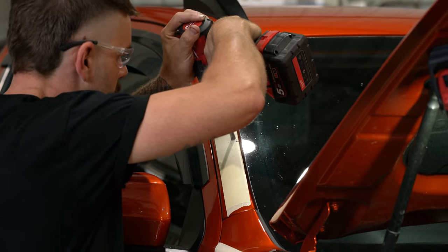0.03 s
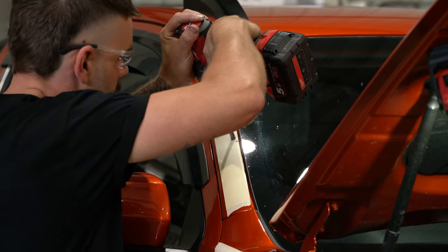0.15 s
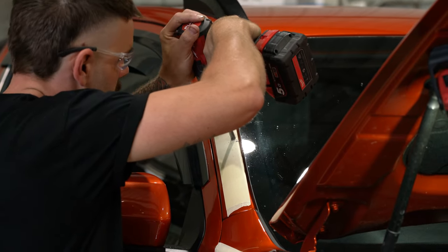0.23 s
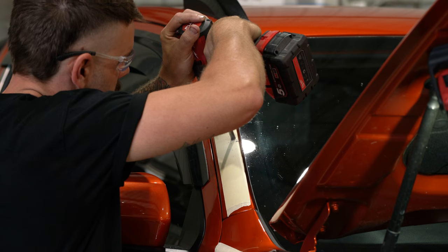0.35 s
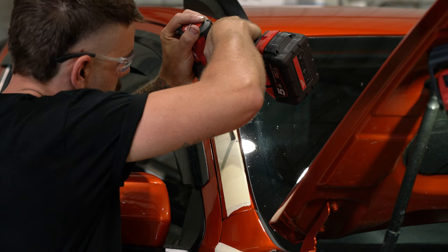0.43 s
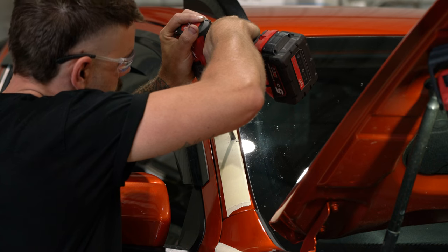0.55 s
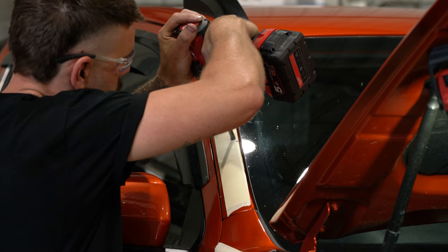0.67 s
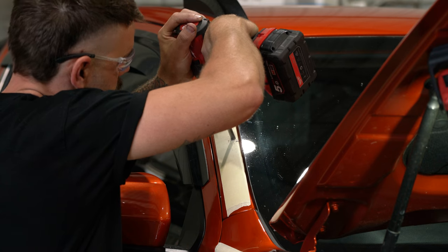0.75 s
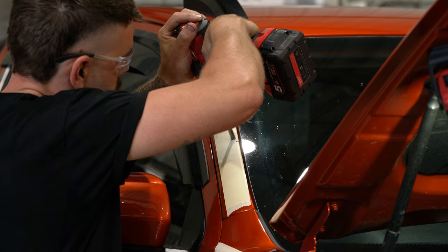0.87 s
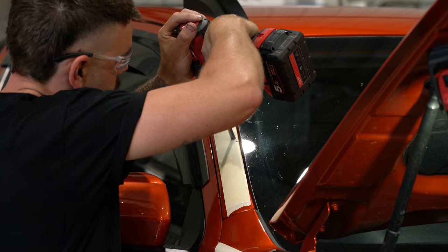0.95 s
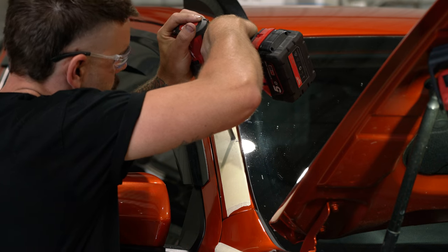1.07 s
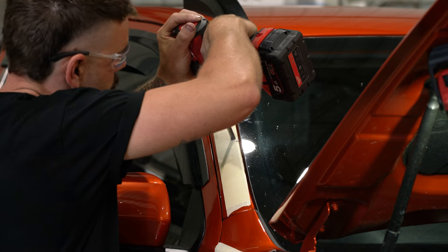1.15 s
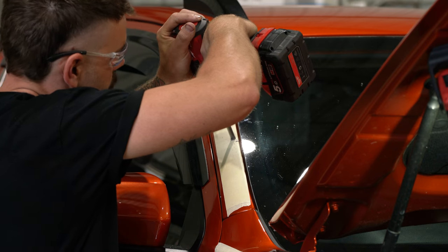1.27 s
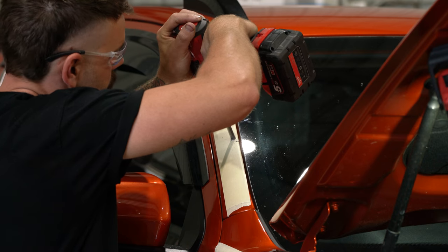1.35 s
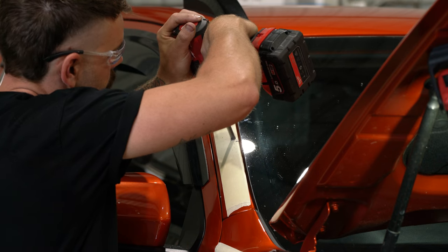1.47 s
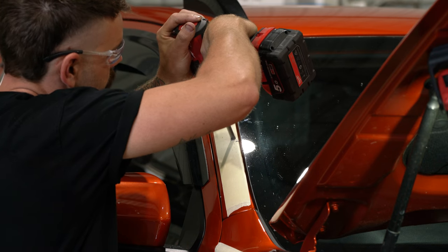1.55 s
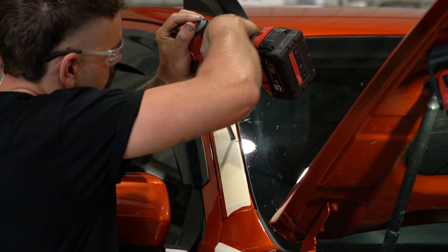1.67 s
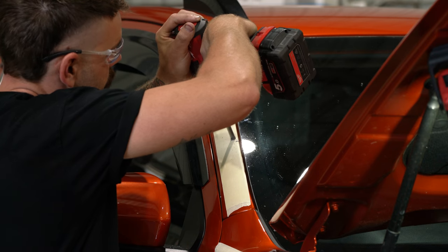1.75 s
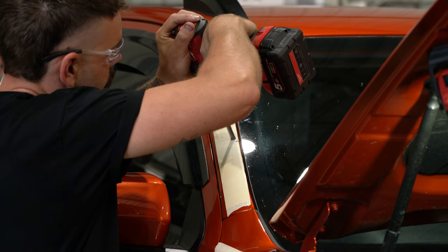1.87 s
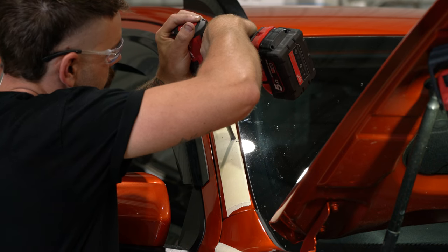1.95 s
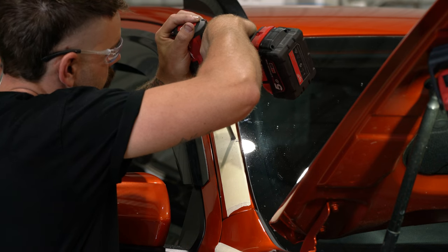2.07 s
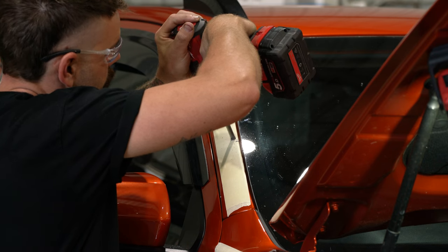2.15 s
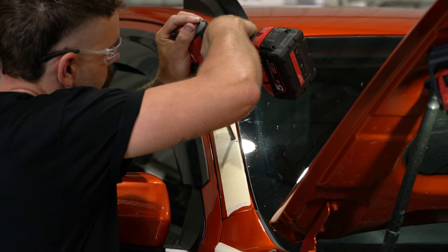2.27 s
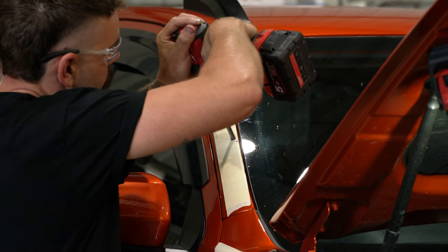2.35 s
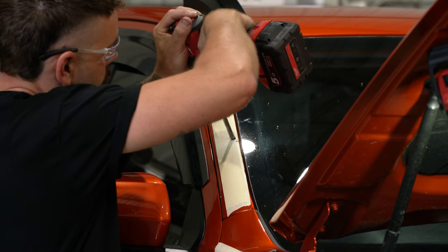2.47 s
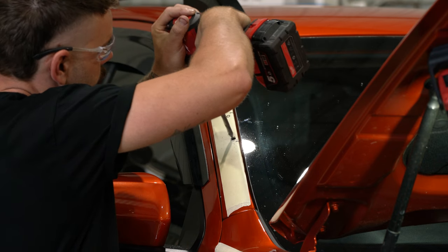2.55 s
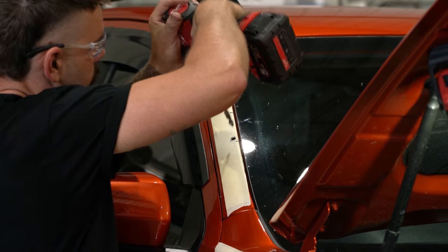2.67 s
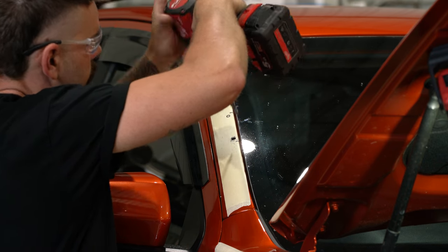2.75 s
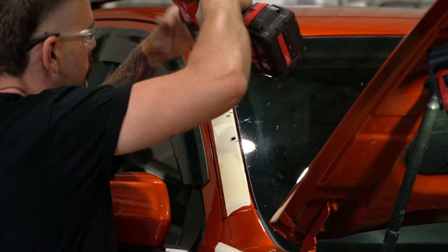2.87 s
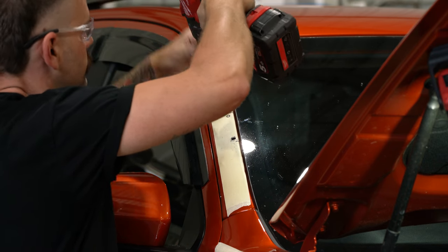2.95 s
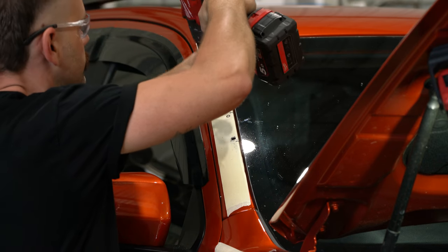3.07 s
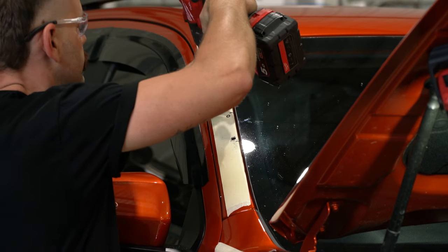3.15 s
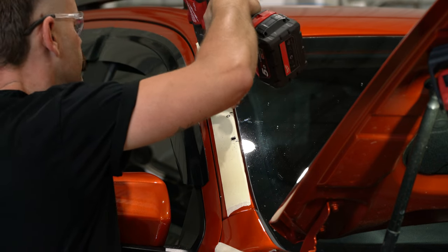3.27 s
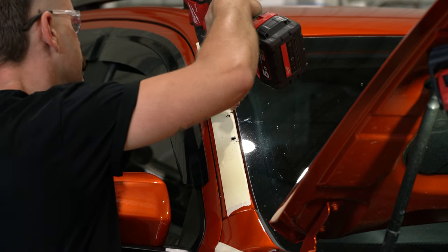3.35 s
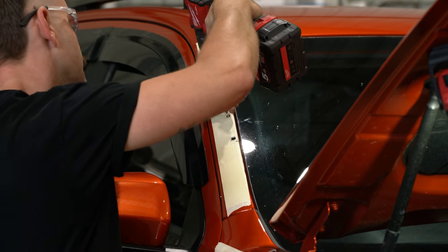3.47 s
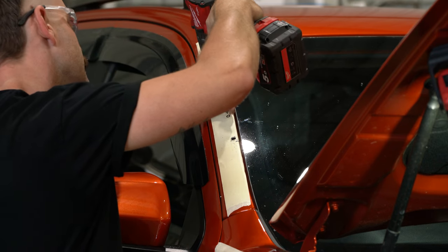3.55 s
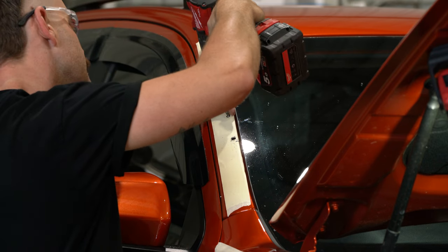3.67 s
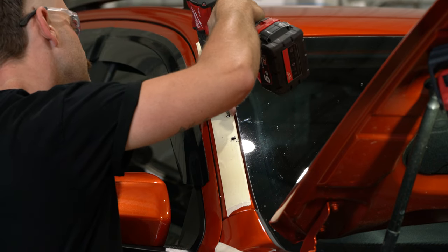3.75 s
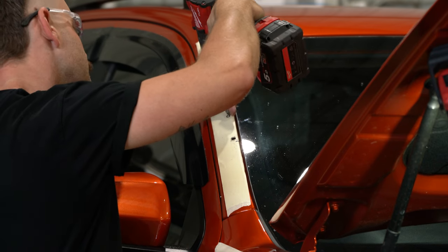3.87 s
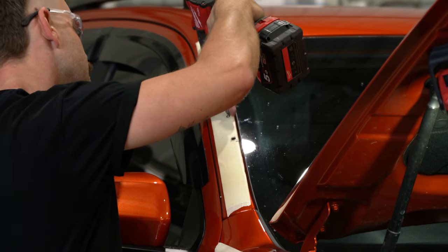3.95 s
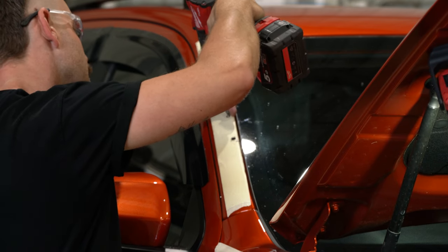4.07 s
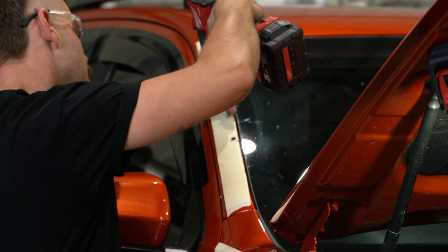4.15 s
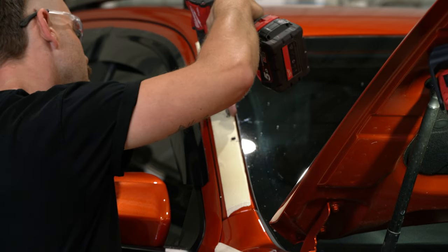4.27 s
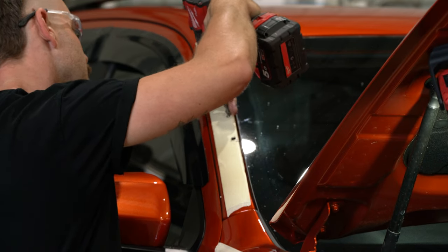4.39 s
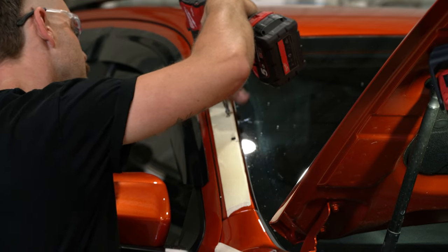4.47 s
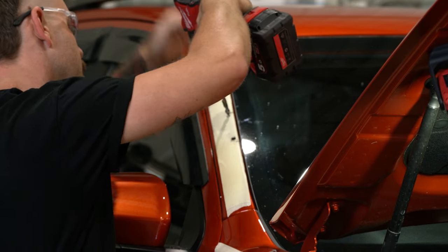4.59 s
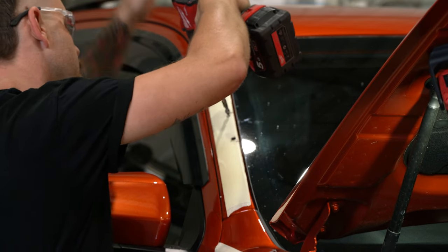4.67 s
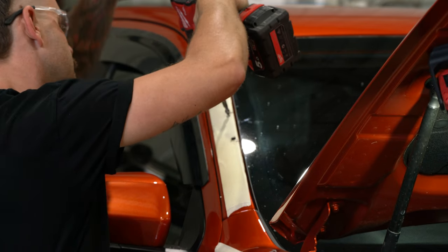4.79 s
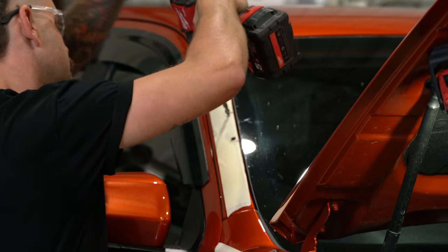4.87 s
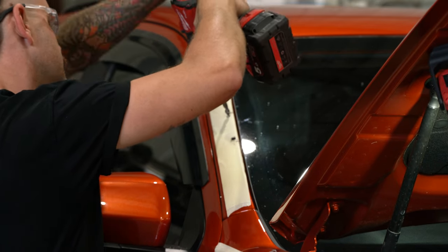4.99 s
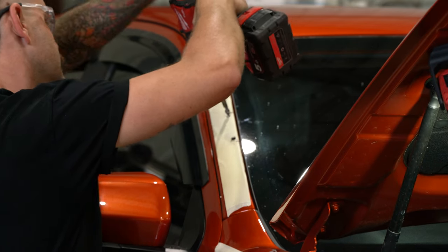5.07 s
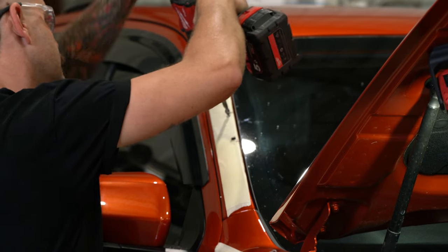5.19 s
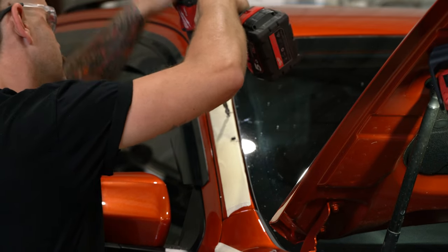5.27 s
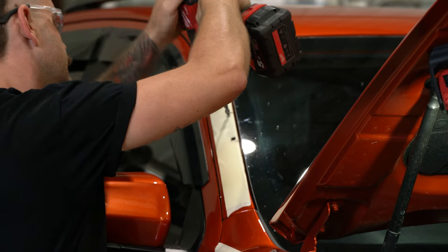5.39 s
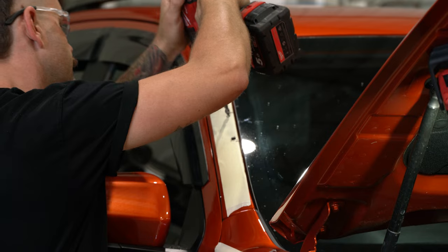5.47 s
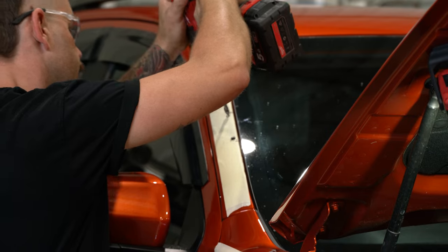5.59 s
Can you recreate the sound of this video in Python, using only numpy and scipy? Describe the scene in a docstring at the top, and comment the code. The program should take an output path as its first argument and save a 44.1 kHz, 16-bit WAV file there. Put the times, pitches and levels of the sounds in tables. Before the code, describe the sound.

In a large reverberant workshop, a nearby microphone catches a drill's piercing electric whine and gear buzz over gritty metal scraping. Early chirps and chip crackles lead to a harsh low judder, then short squeals. The motor drops to a stop in a fraction of a second, with sharp knocks. Afterwards there is mostly steady air noise and faint hum, then quiet handling clicks, cloth rustle and a dull bump.

```python
"""A drill motor whines close by as its bit scrapes through the sheet metal of a car pillar, in a large workshop.
Whine and gear lines are sines on the rotor angle; the whine passes a housing resonance and its pitch sags and recovers.
Two flutes, timed by spindle angle, scrape off chips (filtered grains), judder and squeal (gated sines).
The brake stops it with a falling growl and a clatter; the hall rings out (noise tail) over ventilation and a far hum.
Clicks, thuds and brushing (filtered noise, short sines) follow as the tool is handled."""
import sys
import numpy as np
from scipy import signal
from scipy.fft import rfft, irfft, next_fast_len
from scipy.io import wavfile
from scipy.ndimage import uniform_filter1d

SR = 44100
rng = np.random.default_rng(int(sys.argv[2]) if len(sys.argv) > 2 else 0)


def store_wav(level_fs):
    """Save 16-bit WAV to argv[1]."""
    pcm = np.round(np.clip(np.atleast_2d(level_fs), -1, 1) * 32767)
    wavfile.write(sys.argv[1], SR, pcm.T.astype(np.int16))


N = 248283
T = np.arange(N) / SR


def undb(db):
    """Decibels to gain."""
    return 10 ** (np.asarray(db) / 20)


def unit(x):
    """Scale to rms 1."""
    return x / np.sqrt(np.mean(x ** 2) + 1e-18)


def curves(table):
    """Table columns after the first, interpolated linearly over time."""
    s, *columns = np.transpose(table)
    return [np.interp(T, s, column) for column in columns]


def walk(rate_hz):
    """Smoothed random steps of rms 1, about rate_hz changes a second."""
    step = max(int(SR / rate_hz), 1)
    held = np.repeat(rng.standard_normal(N // step + 1), step)
    return unit(uniform_filter1d(held, step)[:N])


def noise():
    """White Gaussian noise."""
    return rng.standard_normal(N)


def colour(x, spectrum, tilt_db_per_octave=0):
    """Minimum-phase filter with the given spectrum, via the folded cepstrum."""
    size = next_fast_len(N + SR // 4, real=True)
    size += size % 2
    octave = np.log2(np.maximum(np.fft.rfftfreq(size, 1 / SR), 1))
    hz, db = np.transpose(spectrum)
    tilted_db = db + tilt_db_per_octave * np.log2(hz / hz[0])
    gain = undb(np.interp(octave, np.log2(hz), tilted_db))
    cepstrum = irfft(np.log(gain))
    # fold to positive time: makes the filter causal
    cepstrum[1:size // 2] *= 2
    cepstrum[size // 2 + 1:] = 0
    return irfft(rfft(x, size) * np.exp(rfft(cepstrum)))[:N]


def grains(rate_hz, spread_db):
    """Random tiny fractures, a few much larger than the rest."""
    size = undb(spread_db * np.minimum(rng.exponential(size=N), 5))
    return (rng.random(N) < rate_hz / SR) * size * rng.choice([-1, 1], N)


def swell(s, length_s):
    """Bell-shaped envelope centred on s."""
    return np.exp(-np.minimum((2 * (T - s) / length_s) ** 2, 50))


def ramp(start_s, length_s):
    """Linear rise from 0 to 1 over length_s."""
    return np.clip((T - start_s) / max(length_s, 1 / SR), 0, 1)


def decay(s, t60_s):
    """Decay from s, falling 60 dB every t60_s."""
    return np.exp(-np.log(1000) * (T - s) / t60_s)


def catches(cycles, s, width):
    """One bell-shaped touch per cycle, one of them at s; width is a share of the cycle."""
    offset = (cycles - np.interp(s, T, cycles) + .5) % 1 - .5
    return np.exp(-(2 * offset / width) ** 2)


def sine(turns):
    """Sine of rms 1 from phase in turns."""
    return np.sqrt(2) * np.sin(2 * np.pi * turns)


def glide(hz):
    """Phase in turns of a varying frequency."""
    return np.cumsum(hz) / SR


POLES, FULL_SPEED_HZ = 8, 376.7  # magnetic pulls per turn; rotor speed at full trigger
HOUSING_HZ, HOUSING_WIDTH_HZ = 2870, 430
# rotor harmonics and gear meshes: multiple of rotor speed, level at half trigger/dB, level at full trigger/dB
MESH_LINES = [(1, -46.5, -44.5), (4, -35.5, -41.5), (7, -39, -38), (9, -39.5, -42), (10.22, -27, -35.5),
              (10.5, -30.5, -48), (13, -38, -34.5), (13.2, -30.5, -44)]
# gearbox rattle spectrum: f/Hz, level/dB per Hz
GEARBOX_SPECTRUM = [(100, -26), (300, -37.5), (480, -12.5), (780, 0), (1000, 4), (1200, -7.5), (1800, -20),
                    (2050, -0.5), (2600, -13.5), (3400, 1), (3950, -2), (4500, -9), (6500, -22),
                    (10500, -27), (15500, -42.5)]
# tool casing spectrum, also rung by chips, blows and clatter: f/Hz, level/dB per Hz
CASING_SPECTRUM = [(30, -62), (150, -26), (450, -13), (850, 3), (1600, -2), (3000, 4.5), (4200, -5),
                   (5200, -5.5), (7000, -10), (8500, -21), (12000, -22.5), (15500, -41)]


def motor(rotor, hz, whine_db, running, loose, mesh_flutter_db=0.7, mesh_db_per_hz=0.1,
          slack_turns=0.03, loose_slack_turns=.05, rattle_db=-26.5, rumble_db=-31.0,
          rumble_tilt_db=-6, flutter_db=0.27):
    """Magnetic pulls whine through the housing mode; slack gears add lines, louder with speed, and a rattle."""
    housing = 1 / np.hypot(1, 2 * (POLES * hz - HOUSING_HZ) / HOUSING_WIDTH_HZ)
    flutter = flutter_db * (1 + 2 * loose) * walk(60)
    whine = housing * undb(whine_db + flutter) * sine(POLES * rotor)
    play = slack_turns + loose_slack_turns * loose
    speed_db = mesh_db_per_hz * (hz - FULL_SPEED_HZ)
    mesh = np.zeros(N)
    for multiple, half_db, full_db in MESH_LINES:
        line_db = loose * half_db + (1 - loose) * (full_db + speed_db)
        line_gain = undb(line_db + mesh_flutter_db * walk(60))
        mesh += line_gain * sine(multiple * rotor + play * walk(130))
    once_per_turn = 1 + 0.22 * np.cos(2 * np.pi * rotor)
    rattle = unit(colour(noise() * once_per_turn, GEARBOX_SPECTRUM))
    rumble = unit(colour(noise(), CASING_SPECTRUM, rumble_tilt_db))
    gears = mesh + undb(rattle_db) * rattle + undb(rumble_db) * loose * rumble
    return whine + running * gears


def whistle(low_hz=9465, low_db=-56, high_hz=14400, high_db=-65):
    """Two faint tones flicker high above the whine, at nearly constant pitch."""
    low = undb(low_db + 2 * walk(20)) * sine(glide(low_hz + 22 * walk(60)))
    high = undb(high_db + 2 * walk(20)) * sine(glide(high_hz + 18 * walk(60)))
    return low + high


BRAKE_S, STOP_S = 2.627, 2.686


def brake(rotor, hz, growl_db=-16, ring_hz=930, width_hz=560, fade_hz=760, rough_db=3,
          slack_turns=.09, clatter_db=-24):
    """Braked gears growl four times a turn, sweeping down through a gearbox resonance; teeth clatter."""
    growl_hz = 4 * hz
    resonance = 1 / (1 + (2 * (growl_hz - ring_hz) / width_hz) ** 2)
    force = np.clip(growl_hz / fade_hz, 0, 1) ** 4
    rough = undb(rough_db * walk(300))
    growl = force * resonance * rough * sine(4 * rotor + slack_turns * walk(300))
    clatter = unit(colour(grains(rate_hz=3000, spread_db=4), CASING_SPECTRUM))
    return undb(growl_db) * growl + undb(clatter_db) * ramp(BRAKE_S, 0.027) * clatter


# scraped sheet spectrum: f/Hz, level/dB per Hz
SCRAPE_SPECTRUM = [(200, -37.5), (550, -24), (800, -11), (1130, -1), (1450, 2.5), (1800, -1), (3300, -0.5),
                   (4600, -9), (6000, -10), (7800, -19), (11000, -30), (15500, -37)]


def cutting(spindle, feed_db, locked, scrape_db=1.3, uneven_db=1.4, chip_db=-16, bite_db=1.33,
            judder_bite_db=.5):
    """Each of two flutes tears at the sheet once a turn; chips snap off brightly."""
    bite = np.cos(4 * np.pi * spindle) + 0.5 * np.cos(2 * np.pi * spindle)
    force = undb((bite_db + judder_bite_db * locked) * bite + uneven_db * walk(120))
    scrape = unit(colour(grains(rate_hz=7000, spread_db=2.5) * force, SCRAPE_SPECTRUM))
    flakes = grains(rate_hz=400, spread_db=3.3) * force ** 2.5
    chips = unit(colour(flakes, CASING_SPECTRUM, tilt_db_per_octave=7))
    return undb(feed_db) * (undb(scrape_db) * scrape + undb(chip_db) * chips)


def skating(level_db=-41):
    """A bright hiss of grains as the bit skates."""
    return undb(level_db) * unit(colour(grains(rate_hz=7000, spread_db=2.5), CASING_SPECTRUM, 5))


JUDDER_S, JUDDER_ATTACK_S, JUDDER_HOLD_S, JUDDER_RELEASE_S = 1.011, .05, .56, .2
JUDDER_LIGHT_HZ, JUDDER_LOCKED_HZ = 1850, 1381


def chatter(spindle, feed_db, locked, light_db=-2.5, locked_db=-4.3, second_db=0, third_db=-10,
            uneven_db=2.0, stray_share=.045):
    """Each flute judders in a short rasp, low and rich once locked in, rising as the edge breaks free."""
    hz = JUDDER_LIGHT_HZ + locked * (JUDDER_LOCKED_HZ - JUDDER_LIGHT_HZ)
    flute = (2 * spindle + .5) % 1
    grip = unit(np.sin(np.pi * flute) ** 4 * undb(uneven_db * walk(49.92)))
    # pitch strays more when lightly pressed
    stray = stray_share * (2 - locked) * walk(60) + .03 * walk(250)
    release = np.clip(4.5 * (flute - .48), 0, 2) ** 1.5 * np.abs(walk(50))
    turns = glide(hz * (1 + .4 * release + stray))
    overtones = undb(second_db) * sine(2 * turns) + undb(third_db) * sine(3 * turns)
    rasp = sine(turns) + locked * overtones
    level_db = feed_db + light_db + locked * (locked_db - light_db)
    return undb(level_db) * grip * rasp


# spells of stick-slip: centre t/s, length/s, level/dB, squeals per turn
SQUEAL_SPELLS = [(.068, .16, -32.5, 1), (.621, 0.048, -25.5, 2), (.681, .07, -26, 2), (1.686, .08, -26, 1),
                 (1.805, 0.074, -20, 1), (1.885, .03, -21.5, 1), (1.926, 0.063, -20, 1),
                 (2.125, 0.24, -31, 1)]


def squeals(spindle, feed_db, bit_hz=6450, octave_db=-25, patchy_db=2, stick_turns=0.29,
            sing_db=-17, fed_db=-23, waver_hz=45):
    """The bit sings faintly at its own mode and squeals where it sticks, at the same angle of each turn."""
    stick = np.zeros(N)
    for s, length_s, db, count in SQUEAL_SPELLS:
        per_turn = round(count)
        touch = catches(per_turn * spindle, s, per_turn * stick_turns)
        stick += undb(db) * swell(s, length_s) * (touch + undb(sing_db))
    turns = glide(bit_hz + waver_hz * walk(400))
    tone = sine(turns) + undb(octave_db) * sine(2 * turns)
    return (stick + undb(feed_db + fed_db)) * undb(patchy_db * walk(120)) * tone


# spells of thin chirps: centre t/s, length/s, level/dB
CHIRP_SPELLS = [(.044, 0.062, -30.5), (.139, 0.12, -32.5), (.457, .025, -36), (.602, .012, -39)]


def chirps(spindle, feed_db, edge_hz=11540, width=0.28, fed_db=-27, patchy_db=4):
    """The edge chirps thinly as each flute passes: faintly with the feed, clearly in a few spells."""
    spells = np.zeros(N)
    for s, length_s, db in CHIRP_SPELLS:
        spells += undb(db) * swell(s, length_s) * catches(2 * spindle, s, width)
    faint_gain = undb(feed_db + fed_db + patchy_db * walk(50))
    faint = faint_gain * catches(2 * spindle, JUDDER_S, width)
    return (spells + faint) * sine(glide(edge_hz + 70 * walk(500)))


# large chips snapping off: t/s, level/dB
CHIP_SNAPS = [(.28, -34), (.29, -29), (.314, -25.5), (.437, -23.5), (0.456, -23), (.48, -22.5),
              (1.028, -24), (1.048, -28)]


def snaps(length_s=0.0047, tilt_db=7):
    """The largest chips break with a brief, bright crackle."""
    burst = sum(undb(db) * swell(s, length_s) for s, db in CHIP_SNAPS)
    return burst * unit(colour(noise(), CASING_SPECTRUM, tilt_db))


# blows of brake, spindle lock and hand on the tool: t/s, level/dB, t60/s, tilt/dB per octave
TOOL_KNOCKS = [(2.64, -15, 0.026, 0), (2.65, -14, 0.028, 1), (2.677, -12.5, .03, -2),
               (2.683, -13.5, 0.013, -1), (2.699, -18, 0.015, -7.5), (2.721, -30, 0.014, 2),
               (4.649, -28, 0.014, -6.5), (4.699, -37, .024, -3.5), (5.051, -33, .024, -.5)]


def knocks():
    """Short hard blows: decaying noise through the tool casing."""
    out = np.zeros(N)
    for s, db, t60_s, tilt_db in TOOL_KNOCKS:
        blow = (T >= s) * np.exp(-np.log(1000) * np.clip((T - s) / t60_s, 0, 10))
        blow_rms = np.sqrt(np.mean(blow ** 2))
        out += undb(db) * blow_rms * unit(colour(blow * noise(), CASING_SPECTRUM, tilt_db))
    return out


# dull bumps against the body: centre t/s, level/dB, length/s, f at centre/Hz
BODY_BUMPS = [(2.416, -28.5, 0.013, 150), (2.465, -22, 0.033, 169), (5.31, -36, 0.036, 161)]


def bumps(overtone_db=-14, sag_hz_per_s=800):
    """Soft, heavily damped low thuds that sag in pitch."""
    out = np.zeros(N)
    for s, db, length_s, hz in BODY_BUMPS:
        turns = hz * (T - s) - sag_hz_per_s * (T - s) ** 2 / 2
        tone = sine(turns) + undb(overtone_db) * sine(2 * turns)
        out += undb(db) * swell(s, length_s) * tone
    return out


def handling(touch_s=5.05, touch_db=-52, brush_db=-57, rub_db=-63, ring_hz=2050, ring_db=-51, ring_t60_s=.9):
    """A hand brushes the tool and leaves it ringing briefly; a thin, faint rubbing comes and goes."""
    # f/Hz, level/dB per Hz
    broad = [(600, -26), (2200, 4), (5000, 0), (6500, -4), (8800, -4), (11000, -18), (15000, -20)]
    thin = [(2500, -6), (4400, -4), (5200, -6), (5900, 2), (6700, -10), (8800, -8), (10000, -17), (15000, -30)]
    contact = undb(touch_db) * swell(touch_s, 0.028) + undb(brush_db) * swell(5.08, 0.19)
    brush = contact * unit(colour(noise(), broad))
    rub_envelope = swell(3.61, 0.67) + swell(5.35, .1)
    rub = undb(rub_db) * rub_envelope * unit(colour(grains(rate_hz=3300, spread_db=2.0), thin))
    fade = (T >= touch_s) * np.exp(-np.log(1000) * np.abs(T - touch_s) / ring_t60_s)
    ring = undb(ring_db) * fade * sine(glide(ring_hz + 80 * walk(300)))
    return brush + rub + ring


def sleeve(s=4.68, length_s=.55, level_db=-47.5):
    """A sleeve rustles softly as the arm is raised: grains filtered dull."""
    # f/Hz, level/dB per Hz
    cloth = [(60, -15), (130, 0), (350, 0), (750, -3), (1600, -10), (4000, -26), (15000, -60)]
    return undb(level_db) * swell(s, length_s) * unit(colour(grains(rate_hz=3000, spread_db=2.5), cloth))


def reverb(x, t60_low_s=0.88, t60_mid_s=1.53, t60_high_s=.6, wet_db=-15.0):
    """Diffuse hall tail: decaying noise in three bands; the treble dies first."""
    tail = np.zeros(N)
    bands = ((100, 1500), t60_low_s), ((1500, 5000), t60_mid_s), ((5000, 15000), t60_high_s)
    for edges_hz, t60_s in bands:
        bandpass = signal.butter(2, edges_hz, "bandpass", fs=SR, output="sos")
        tail += signal.sosfilt(bandpass, noise()) * decay(0, t60_s)
    tail *= ramp(0, 0.007)
    return undb(wet_db) * signal.fftconvolve(x, unit(tail) / np.sqrt(N))[:N]


AIR_DB, HUM_DB, HUM_OCTAVE_DB = -43.0, -59.5, -56.5
# drifting pitch of the far hum: t/s, f/Hz
HUM_PITCH = [(.4, 85), (.55, 74), (1.3, 74.86), (2.7, 89), (4.25, 98), (5.63, 100.1)]
# hum swells: centre t/s, length/s, fundamental level/dB, octave level/dB
HUM_SWELL_LEVELS = [(.29, .14, -44, -58), (.8, 0.8, -81, -53.5), (1.7, .42, -66, -46.5),
                    (2.72, .3, -54, -77), (3.47, 0.54, -45, -72), (4.22, .25, -54.5, -63)]
# ventilation spectrum: f/Hz, level/dB per Hz
HALL_SPECTRUM = [(25, -50), (45, -33), (65, -19.5), (85, -4), (115, -0.5), (230, -5), (340, -3.5),
                 (420, -6.5), (800, -8), (1650, -14.5), (3200, -23.5), (5000, -36), (9000, -43),
                 (15000, -57)]


def workshop():
    """Nearly steady ventilation noise and a far, wavering hum that swells now and then."""
    hz, = curves(HUM_PITCH)
    turns = glide(hz * (1 + .007 * walk(26)))
    low, octave = undb(HUM_DB), undb(HUM_OCTAVE_DB)
    for s, length_s, low_db, octave_db in HUM_SWELL_LEVELS:
        low = low + undb(low_db) * swell(s, length_s)
        octave = octave + undb(octave_db) * swell(s, length_s)
    hum = low * sine(turns) + octave * undb(2 * walk(6.95)) * sine(2 * turns)
    air = undb(AIR_DB + .4 * walk(14)) * unit(colour(noise(), HALL_SPECTRUM))
    return hum + air


GEAR_RATIO, FULL_FEED_DB = 14.8, -21
WHINE_DB, LEAN_DB = -11.1, -6.1  # leaning on the tool damps the whine
# motor whine pitch before braking: t/s, f/Hz
WHINE_PITCH = [(0.0, 2663), (0.04, 2507), (0.12, 2391), (0.15, 2371), (0.22, 2491), (0.25, 2735),
               (0.28, 2853), (0.33, 2887), (0.46, 2907), (0.52, 2835), (0.74, 2998), (0.85, 3026),
               (0.92, 3009), (1.24, 3055), (1.36, 3050), (1.88, 2959), (2.01, 3028), (2.25, 3028),
               (2.36, 2901), (2.38, 2972), (2.47, 3061), (2.58, 3051), (2.62, 2923)]
# how hard the bit is fed into the sheet: t/s, level/dB
BIT_FEED = [(0.0, -27), (0.23, -25.5), (0.25, -35.5), (0.44, -29.5), (0.53, -38), (0.74, -25), (1.46, -21),
            (1.47, -24.5), (1.59, -21.5), (1.99, -30.5), (2.13, -23.5), (2.15, -28), (2.32, -25.5),
            (2.36, -32), (2.42, -30), (2.62, -34.5)]


def scene(brake_whine_db=-7, jolt=.0025, motor_hall_db=-8):
    """One shaft speed drives motor, gears and bit; the feed sets the cutting level; the brake stops it all."""
    whine_hz, = curves(WHINE_PITCH)
    feed_db, = curves(BIT_FEED)
    pressure = undb(feed_db - FULL_FEED_DB)
    # the brake drains rotor energy at a steady rate
    hz = whine_hz / POLES * np.sqrt(1 - ramp(BRAKE_S, STOP_S - BRAKE_S))
    rotor = glide(hz * (1 + jolt * pressure * walk(80)))
    spindle = (rotor - np.interp(JUDDER_S, T, rotor)) / GEAR_RATIO
    running = np.clip(hz / 290, 0, 1) ** 2
    # at half trigger: gears loose, bit skates instead of juddering
    loose = np.clip((355 - hz) / 40, 0, 1)
    braking = ramp(BRAKE_S, .002)
    turning = 1 - ramp(STOP_S - .002, .002)
    judder_end_s = JUDDER_S + JUDDER_ATTACK_S + JUDDER_HOLD_S
    locked = ramp(JUDDER_S, JUDDER_ATTACK_S) - ramp(judder_end_s, JUDDER_RELEASE_S)

    whine_db = WHINE_DB + LEAN_DB * pressure + brake_whine_db * braking
    drive = motor(rotor, hz, whine_db, running, loose) + whistle()
    drill = turning * (drive + braking * brake(rotor, hz))
    judder = (1 - loose) * np.sqrt(pressure) * chatter(spindle, feed_db, locked)
    edge = cutting(spindle, feed_db, locked) + loose * skating() + judder
    bit = running * (edge + squeals(spindle, feed_db) + chirps(spindle, feed_db))
    work = bit + snaps() + knocks() + bumps() + handling() + sleeve()
    # the wide panel feeds the hall more than the small motor does
    hall = reverb(undb(motor_hall_db) * drill + work)
    return (drill + work + hall + workshop())[None]


def record(dry):
    """The microphone sheds deep bass, rounds the tallest peaks and cuts the top."""
    highpass = signal.butter(4, 52, "highpass", fs=SR, output="sos")
    lean = signal.sosfilt(highpass, dry)
    rounded = lean / (1 + (lean / .76) ** 8) ** (1 / 8)
    lowpass = signal.ellip(10, .2, 80, 15750, fs=SR, output="sos")
    return signal.sosfilt(lowpass, rounded)


dry = scene()
out = record(dry)
store_wav(out)
```